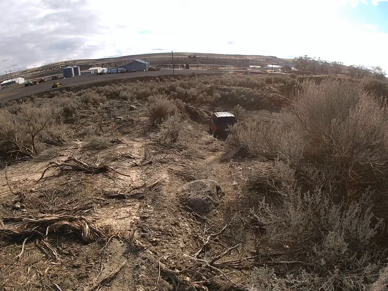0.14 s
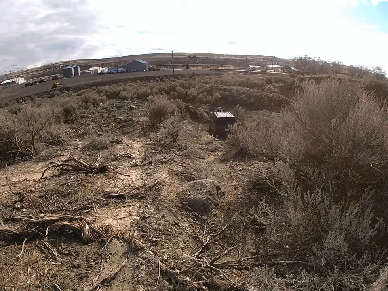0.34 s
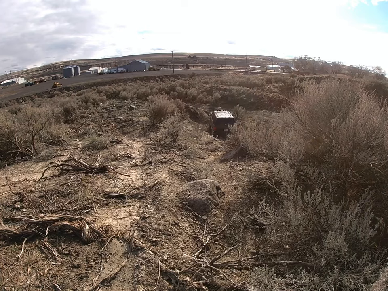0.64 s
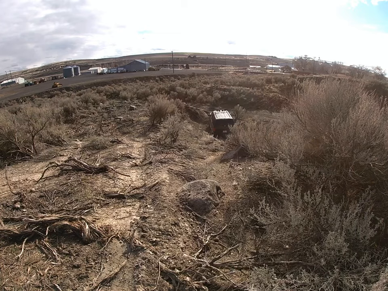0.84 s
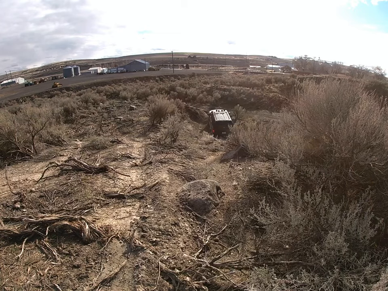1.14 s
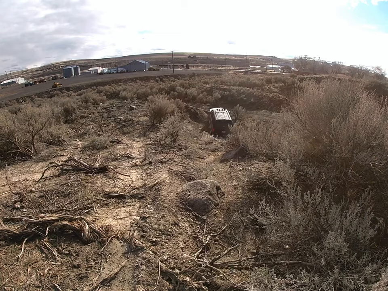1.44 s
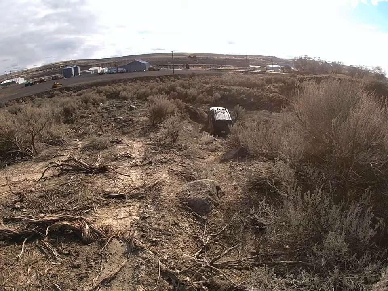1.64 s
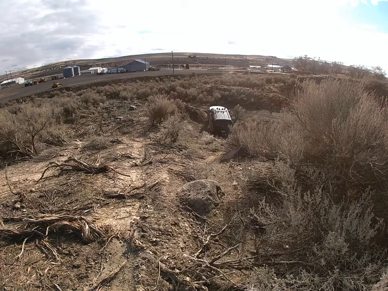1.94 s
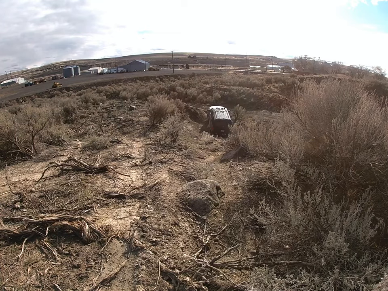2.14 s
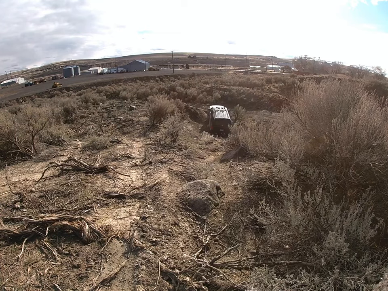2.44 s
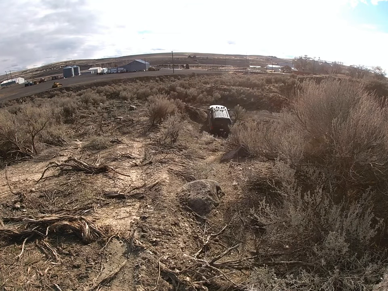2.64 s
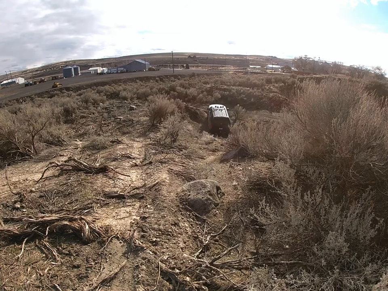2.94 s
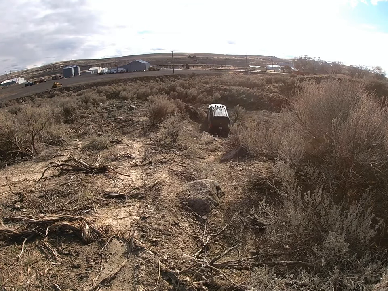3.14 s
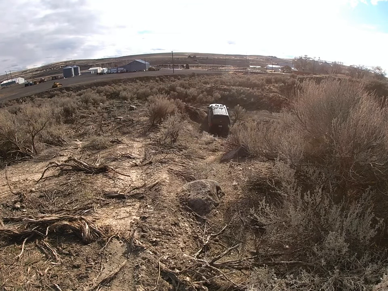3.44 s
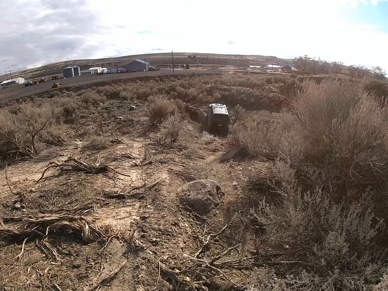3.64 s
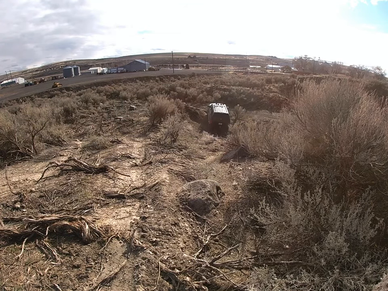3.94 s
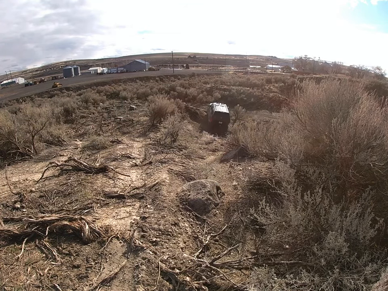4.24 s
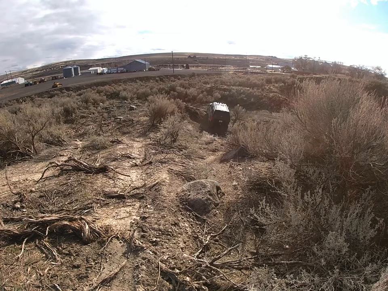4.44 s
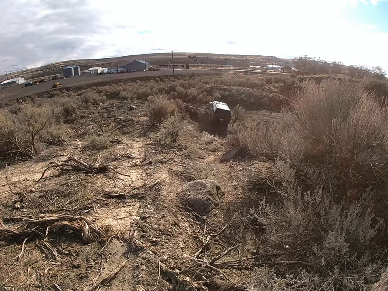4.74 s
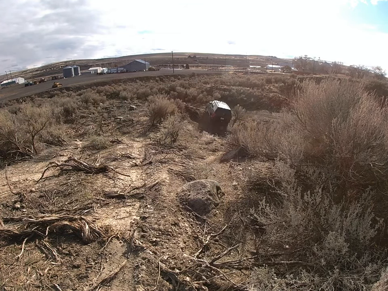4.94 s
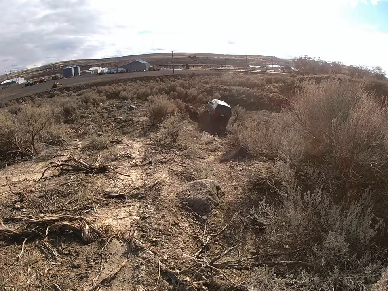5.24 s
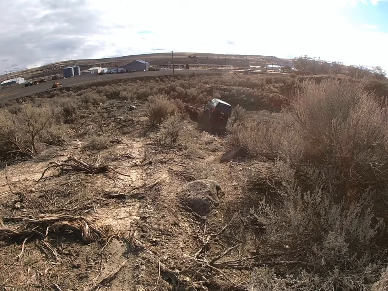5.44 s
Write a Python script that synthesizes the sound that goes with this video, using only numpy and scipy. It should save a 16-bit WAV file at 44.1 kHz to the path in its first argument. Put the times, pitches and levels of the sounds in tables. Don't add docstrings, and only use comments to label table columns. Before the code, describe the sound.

Far-off uneven V8 exhaust climbs a dirt trail in rising surges, with wind thumps, brush rustle, small cracks and faint squeaks.

```python
import sys
import numpy as np
from scipy import signal
from scipy.fft import rfft, irfft, next_fast_len
from scipy.io import wavfile
from scipy.ndimage import uniform_filter1d, map_coordinates

SR = 44100
rng = np.random.default_rng(int(sys.argv[2]) if len(sys.argv) > 2 else 0)


def file_out(sig):
    cols = np.atleast_2d(sig).T
    lim = np.clip(cols, -1, 1)
    pcm = np.round(lim * 32767).astype(np.int16)
    wavfile.write(sys.argv[1], SR, pcm)


def elevation(decibels):
    levels = np.asarray(decibels, float)
    return 10 ** (levels / 20)


N = 246078


def unit(x):
    return x / np.sqrt(np.mean(x ** 2) + 1e-20)


def along(points, hz):
    f, v = np.transpose(points)
    return np.interp(np.log(hz + 1), np.log(f + 1), v)


def curves(rows):
    s, *cols = np.transpose(rows)
    return [np.interp(np.arange(N) / SR, s, c) for c in cols]


def wobble(rate):
    knots = rng.standard_normal(int(N * rate / SR) + 4)
    return map_coordinates(knots, [np.arange(N) * rate / SR])


def coloured(x, spectrum):
    m = next_fast_len(N + 8192)
    gain = elevation(along(spectrum, np.fft.rfftfreq(m, 1 / SR)))
    return irfft(rfft(x, m) * gain, m)[:N]


def noise(spectrum, swell=1):
    return unit(coloured(swell * rng.standard_normal(N), spectrum))


def burst(hz, cycles):
    u = np.arange(int(4 * cycles * SR / hz)) * hz / SR
    return np.sin(2 * np.pi * u) * np.exp(-u / cycles) * (1 - np.exp(-u / 0.22))


def engine():
    # time in seconds, four-stroke cycles per second, then levels in dB of
    revs = [(0.0, 6.52, -44.5, -25.5, -53.5, -31.5), (0.11, 7.02, -35.5, -26.5, -25, -38),
            (0.22, 7.52, -31.5, -28, -35, -36), (0.33, 7.91, -32.5, -28.5, -35, -49),
            (0.45, 8.12, -36.5, -29, -31.5, -51.5), (0.56, 8.21, -32, -30.5, -41, -35),
            (0.67, 8.14, -31.5, -29.5, -36, -44.5), (0.78, 8.03, -38.5, -34.5, -46, -58),
            (0.89, 8.01, -33.5, -31, -46, -58), (1.0, 7.95, -35.5, -29, -43, -52),
            (1.12, 7.87, -43.5, -29.5, -37, -55), (1.23, 7.75, -36.5, -33, -41, -58),
            (1.34, 7.51, -56, -37, -37, -56), (1.45, 7.21, -56, -35, -49, -61),
            (1.56, 6.99, -57, -32.5, -50, -52), (1.67, 6.81, -66, -39, -43, -41),
            (1.79, 6.5, -35, -23, -35, -41), (1.9, 6.32, -36.5, -37.5, -44, -38),
            (2.01, 6.63, -42, -26, -31.5, -57), (2.12, 7.49, -32, -22, -27, -38),
            (2.23, 8.47, -25.5, -25, -39.5, -49), (2.34, 8.85, -25.5, -25, -44.5, -41),
            (2.46, 8.79, -29.5, -27, -43, -46), (2.57, 8.58, -34, -26, -38, -48.5),
            (2.68, 8.13, -34.5, -27.5, -33.5, -42), (2.79, 7.79, -42, -26.5, -40, -35),
            (2.9, 8.02, -35, -23, -31, -46), (3.01, 8.81, -26, -25, -31.5, -51),
            (3.12, 9.45, -21.5, -29.5, -41, -40), (3.24, 9.47, -26, -28.5, -36, -38),
            (3.35, 9.02, -28, -29, -52.5, -53), (3.46, 8.48, -37, -28.5, -46, -54),
            (3.57, 8.09, -35.5, -26.5, -30.5, -49), (3.68, 8.22, -30, -25, -35, -41),
            (3.79, 8.82, -24, -25, -39, -48.5), (3.91, 9.48, -21, -34.5, -34, -30.5),
            (4.02, 10.03, -20, -33, -33.5, -31), (4.13, 10.41, -20.5, -33.5, -32.5, -26.5),
            (4.24, 10.56, -21, -36.5, -29, -25.5), (4.35, 10.51, -21, -36.5, -30.5, -26),
            (4.46, 10.4, -22, -40, -28, -26), (4.58, 10.4, -22, -32, -32.5, -27),
            (4.69, 10.64, -21.5, -43.5, -28.5, -27), (4.8, 11.05, -22, -39.5, -29, -27),
            (4.91, 11.35, -22.5, -45, -26.5, -27.5), (5.02, 11.47, -22.5, -48, -30, -27),
            (5.13, 11.47, -22.5, -37, -26.5, -30), (5.25, 11.4, -22, -44, -25.5, -34),
            (5.36, 11.3, -21.5, -54, -29, -29), (5.47, 11.12, -21, -43, -33, -27),
            (5.58, 10.78, -23, -57, -22, -25.5)]
    rate, firing_db, second_db, eleventh_db, thirteenth_db = curves(revs)
    rate = uniform_filter1d(rate, size=2600)
    crank = 2 * np.pi * np.cumsum(rate) / SR + 1.1434
    strong = {8: firing_db, 16: second_db, 11: eleventh_db, 13: thirteenth_db}
    return exhaust(rate, crank, strong) + roar(crank) + bark(crank, firing_db)


def exhaust(rate, crank, levels):
    banks = [1, -1, -1, 1, -1, 1, 1, -1]
    # order, level in dB under the firing order
    loaded = [(5, -6), (7, -14), (12, -18)]
    # order, level in dB
    steady = [(3, -4), (4, -6), (6, -5), (9, 1), (10, 0), (14, 4), (15, 0), (17, -4), (18, 1), (19, 0),
              (20, 1), (21, -2), (22, 0), (24, -2)]
    # frequency in Hz, gain in dB
    muffler = [(20, -6), (38, -6), (46, 0), (150, 0), (170, -5), (200, -9), (230, -10), (250, -22)]
    # frequency in Hz, phase in rad
    bank_lag = [(40, 2.9), (55, 2.1), (75, 1.5), (95, .7), (107, .7), (120, 2), (140, 1.7), (160, .3)]
    lope = np.angle(np.fft.fft(banks))
    firing_db = levels[8]
    for order, db in loaded:
        levels[round(order)] = firing_db + db + along(muffler, order * rate)
    for order, db in steady:
        steady_db = -41.5 + 0.14 * (firing_db + 26.5)
        levels[round(order)] = steady_db + db + along(muffler, order * rate)
    out = np.zeros(N)
    for order, db in levels.items():
        if order % 8 == 0:
            lag = -.8 - 0.15 * order
        elif order % 2:
            lag = along(bank_lag, order * rate) + lope[order % len(banks)]
        else:
            lag = 2.6 + .41 * (order - 12.5)
        weak = np.clip((-23 - db) / 18, 0, 1)
        lag = lag + (.04 + .25 * weak) * wobble(7)
        out += elevation(db + (.3 + 2 * weak) * wobble(9)) * np.cos(order * crank + lag)
    return np.sqrt(2) * out


def roar(crank):
    # time in seconds, level in dB
    roar_level = [(0.0, -64), (0.9, -61.5), (1.35, -63), (1.68, -64), (2.1, -64), (2.33, -62), (3.5, -61.5),
                  (4.01, -59.5), (4.68, -60), (4.99, -56), (5.58, -57.5)]
    # frequency in Hz, density in dB per Hz
    roar_tone = [(150, -120), (250, 12), (420, 5), (630, 1), (1000, -3.5), (1250, -3), (1550, -4.5),
                 (1850, -5.5), (2200, -8), (3150, -15), (3500, -18.5), (7500, -30), (9500, -35.5),
                 (10800, -51.5), (12500, -64.5), (14000, -120)]
    throb = elevation(1.1 * np.cos(8 * crank) + 1.1 * wobble(30) + 0.3 * wobble(7.3))
    return elevation(curves(roar_level)[0] + 4.5) * noise(roar_tone, throb)


def bark(crank, firing_db):
    # frequency in Hz, density in dB per Hz
    bark_tone = [(150, -120), (260, -9.5), (330, -4), (430, 0), (520, -8.5), (750, -20), (1500, -120)]
    gate = elevation(2.1 * np.cos(8 * crank) + 1.5 * wobble(25))
    return elevation(-66 + .8 * (firing_db + 29)) * noise(bark_tone, gate)


def wind():
    # time in seconds, buffet level in dB, flutter level in dB
    gusts = [(0.0, -49, -50), (0.09, -51, -51.5), (0.33, -45, -47.5), (0.45, -54, -53.5),
             (0.67, -35.5, -53), (0.76, -48.5, -50.5), (0.99, -45, -52), (1.04, -57, -50.5),
             (1.29, -38, -51.5), (1.33, -42, -48), (1.4, -41, -54.5), (1.57, -36.5, -49), (1.62, -35, -54),
             (1.68, -52, -42.5), (1.71, -36, -44), (1.74, -33.5, -38), (1.8, -27, -44.5),
             (1.85, -40, -38.5), (1.88, -44, -41.5), (1.94, -37.5, -54), (2.04, -57, -55), (2.14, -37, -48),
             (2.27, -36, -45), (2.41, -31, -52.5), (2.47, -32.5, -50), (2.53, -42, -59.5),
             (2.59, -36, -42.5), (2.66, -40, -53), (2.72, -46, -46), (2.75, -31, -42), (2.78, -25.5, -50),
             (2.83, -42, -41), (2.87, -29.5, -47), (2.92, -40, -51), (3.25, -32.5, -50), (3.42, -34, -56.5),
             (3.51, -33.5, -53.5), (3.59, -41, -61.5), (3.84, -34, -48), (3.87, -40.5, -50),
             (3.93, -52.5, -55), (4.33, -40.5, -61), (4.37, -45, -65), (4.49, -45.5, -55), (4.55, -37, -58),
             (4.71, -37, -56), (4.77, -52, -49), (4.85, -41, -62), (4.91, -51, -65), (5.0, -33.5, -57),
             (5.05, -45, -67), (5.28, -51, -56), (5.55, -44.5, -46.5), (5.58, -64, -48)]
    # frequency in Hz, density in dB per Hz
    buffet_tone = [(5, -42), (15, -0.5), (30, -3), (45, -9.5), (100, -14.5), (160, -21), (400, -120)]
    # frequency in Hz, density in dB per Hz
    flutter_tone = [(25, -120), (50, 5.5), (110, 7.5), (200, 12), (292, 1), (450, -15.5), (650, -24),
                    (1200, -42.5), (2500, -120)]
    # time in seconds, peak in dB, frequency in Hz
    thumps = [(1.7485, -15.5, 83.5), (1.794, -23, 42), (1.812, -13, 125), (.66, -38, 21), (1.668, -37, 300),
              (1.7485, -26.5, 375), (1.831, -32, 380), (1.859, -37, 300), (2.18, -37.5, 320),
              (2.249, -34, 340), (2.287, -30.5, 300), (2.602, -35, 360), (2.705, -33, 340),
              (2.736, -32.5, 320), (2.824, -41, 300), (2.844, -32, 300), (2.864, -38, 340),
              (5.395, -30, 320), (5.483, -40.5, 400)]
    buffet_db, flutter_db = curves(gusts)
    buffet = noise(buffet_tone, elevation(2.5 * wobble(22)))
    flutter = noise(flutter_tone, elevation(1.8 * wobble(40)))
    slaps = np.zeros(N + SR)
    for s, db, hz in thumps:
        push = -burst(hz, cycles=1.0)
        start = round((s - .5 / hz) * SR)
        slaps[start:][:len(push)] += elevation(db + 2) * push
    return elevation(buffet_db + 4.5) * buffet + elevation(flutter_db + 7) * flutter + slaps[:N]


def rustle():
    # time in seconds, stems level in dB, leaves level in dB
    stirring = [(0.04, -70.5, -88), (0.14, -71.5, -83), (0.24, -70, -81.5), (0.44, -80, -90),
                (0.64, -77, -87), (0.79, -75, -81.5), (0.84, -74, -78), (0.89, -68, -71),
                (0.94, -73, -76.5), (0.99, -66.5, -74), (1.04, -69, -76.5), (1.09, -64.5, -76),
                (1.14, -61, -68.5), (1.19, -67, -78), (1.24, -73, -78), (1.29, -71, -78),
                (1.44, -72.5, -84), (1.64, -76.5, -83), (1.84, -76, -84), (2.04, -71.5, -85),
                (2.24, -73, -84), (2.44, -70, -82.5), (2.64, -68, -84), (2.74, -68, -86.5),
                (2.84, -65.5, -84), (2.94, -61.5, -81), (3.04, -65.5, -84.5), (3.14, -69, -84),
                (3.24, -71, -86), (3.34, -74, -81), (3.44, -70, -86.5), (3.64, -84.5, -92),
                (3.84, -77.5, -88), (4.04, -76, -88), (4.24, -74, -87), (4.44, -72.5, -93),
                (4.64, -76, -87), (4.69, -77, -88), (4.74, -68, -81.5), (4.79, -62.5, -76.5),
                (4.84, -62, -74.5), (4.89, -65, -77.5), (4.94, -62.5, -78.5), (4.99, -67, -76.5),
                (5.04, -66, -82), (5.09, -74, -87), (5.24, -73, -84), (5.29, -68.5, -85),
                (5.34, -74, -82.5), (5.44, -67, -84)]
    # frequency in Hz, density in dB per Hz
    stems_tone = [(1200, -120), (2000, -7), (3100, 0), (4100, -2), (5700, -3), (7200, -9), (8100, -21),
                  (9500, -120)]
    # frequency in Hz, density in dB per Hz
    leaves_tone = [(4500, -120), (6000, -8.5), (7200, -1.5), (8150, -8.5), (8700, -0.5), (9600, -1),
                   (10800, -14.5), (12600, -23.5), (14000, -120)]
    stems_db, leaves_db = curves(stirring)
    out = np.zeros(N)
    for db, tone, grain in ((stems_db - 2.5, stems_tone, .65), (leaves_db + 1.5, leaves_tone, .25)):
        breaks = elevation(9 * rng.random(N)) * (rng.random(N) < .004)
        crunch = unit(signal.lfilter([1], [1, -.98], breaks))
        out += elevation(db) * noise(tone, 1 + grain * crunch)
    return out


def camera():
    frame_hz = 30
    ticks = np.zeros(N + SR)
    t = np.arange(300) / SR
    for k, (late, vary) in enumerate(rng.random((int(N / SR * frame_hz), 2))):
        start = round((k / frame_hz + .009 * late ** 2.5 + .029) * SR)
        ticks[start:][:len(t)] += elevation(5.9 * vary) * np.sin(np.pi * t / t[-1]) ** 2
    hiss = noise([(5000, -58.5), (6500, -2.5), (7400, 1.5), (8100, -4), (9500, -60)])
    return elevation(-74.5) * ticks[:N] * hiss


def snaps():
    # time in seconds, low, middle and high band levels in dB, tail in dB under the crack
    cracks = [(0.1564, -64, -55, -80.5, -19.5), (0.963, -55, -60, -62, -12.5),
              (0.9908, -56, -66.5, -55, -12.5), (1.086, -50.5, -55.5, -56, -11.5),
              (1.131, -63, -57, -53, -22), (1.1409, -52, -54.5, -59, -14.5), (1.1533, -52, -49, -55, -11.5),
              (1.2621, -67, -59.5, -56.5, -13), (1.3614, -60, -55, -66, -12),
              (2.34, -59.5, -65, -60.5, -26.5), (2.5067, -47.5, -45.5, -45.5, -24.5),
              (2.5457, -68, -59, -60, -26.5), (2.6152, -58, -54.5, -65.5, -14),
              (2.7755, -50.5, -59.5, -71, -18.5), (2.8484, -52, -60, -75.5, -25),
              (2.979, -52, -56.5, -79, -26), (3.0687, -58, -55, -63, -24.5), (3.0929, -72, -52.5, -55, -25),
              (3.106, -60, -58.5, -57, -15), (3.179, -58, -52, -63, -25), (3.1872, -58, -52.5, -61, -20),
              (3.2152, -46, -53, -69, -16), (3.3287, -80, -56, -55.5, -25), (3.3532, -62, -43, -51.5, -28),
              (3.3594, -51, -40.5, -48, -21.5), (3.365, -45, -58, -63.5, -23.5),
              (4.001, -58, -57.5, -72.5, -21), (4.0865, -49, -50, -83.5, -22.5),
              (4.7343, -49, -52.5, -61, -14.5), (4.77, -53, -52, -68, -29), (4.803, -57, -52.5, -66, -13),
              (4.8229, -60, -49, -65, -20), (4.842, -51.5, -51, -53.5, -9.5),
              (4.909, -50.5, -49.5, -62, -9), (4.9457, -51, -57, -69, -7), (5.062, -59, -63, -59.5, -23),
              (5.0747, -64, -58, -52.5, -23), (5.2568, -50, -57.5, -61.5, -14.5),
              (5.277, -55.5, -61.5, -66.5, -5.5), (5.3913, -39.5, -50.5, -69.5, -15.5)]
    # low edge in Hz, high edge in Hz
    snap_bands = [(1100, 3000), (3300, 6500), (6800, 9700)]
    out = np.zeros(N)
    t = np.arange(1300) / SR
    for column, (low_hz, high_hz) in enumerate(snap_bands):
        strikes = np.zeros(N + SR)
        for s, *part_db, tail_db in cracks:
            fall_db = 60 * t / .045
            snap = elevation(tail_db - 3.0 - fall_db) * rng.standard_normal(len(t))
            snap[:3] += [.6, 1, -.5]
            strikes[round(s * SR):][:len(t)] += elevation(part_db[column]) * snap
        band = signal.butter(3, [low_hz, high_hz], "bandpass", fs=SR, output="sos")
        out += signal.sosfilt(band, strikes[:N]) * 0.38 * SR / (high_hz - low_hz)
    return out


def squeaks():
    # start in seconds, length in seconds, pitch in Hz, level in dB
    rubs = [(.236, .012, 5200, -72), (.236, .014, 4570, -71), (1.69, 0.032, 4970, -75),
            (2.05, .05, 1700, -64.5), (2.29, 0.048, 1586, -63.5), (2.33, .07, 1430, -66),
            (2.62, 0.053, 1632, -63.5), (2.75, .04, 1580, -67.5), (2.85, .08, 1475, -70),
            (2.98, .09, 1455, -62), (3.14, 0.065, 1486, -67), (3.21, 0.064, 1470, -66.5),
            (3.86, 0.046, 1170, -60.5), (4.297, 0.023, 3100, -56), (4.295, 0.016, 5130, -67.5),
            (4.96, 0.092, 1230, -61)]
    out = np.zeros(N + SR)
    for s, length, hz, db in rubs:
        t = np.arange(int(length * SR)) / SR
        swell = np.sin(np.pi * t / length)
        out[round(s * SR):][:len(t)] += elevation(db) * swell * np.sin(2 * np.pi * hz * t)
    return out[:N] * elevation(3.3 * wobble(260))


def whine():
    # time in seconds, level in dB
    whine_level = [(0, -79), (1.8, -73.5), (2.1, -70), (3.3, -71.5), (3.7, -74.5), (5.58, -76.5)]
    # frequency in Hz, density in dB per Hz
    case_tone = [(1100, -59), (1400, -11.5), (1455, 1), (1510, -9), (1610, -1), (1720, -9.5), (2100, -59)]
    return elevation(curves(whine_level)[0] + 2.0 * wobble(12)) * noise(case_tone)


def scene():
    vehicle = engine() + squeaks() + whine()
    near = wind() + rustle() + snaps() + camera()
    return (vehicle + near)[None]


def roll_off(x):
    return signal.sosfilt(signal.butter(12, 12720, fs=SR, output="sos"), x)


def record(dry):
    return roll_off(dry)


dry = scene()
out = record(dry)
file_out(out)
```